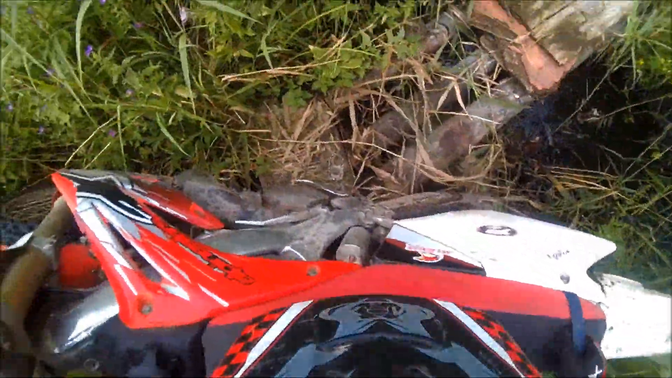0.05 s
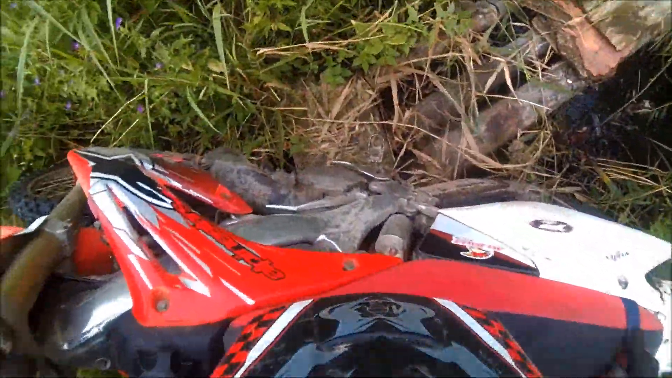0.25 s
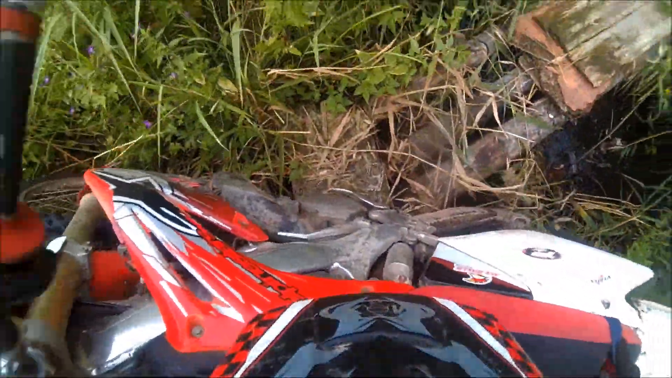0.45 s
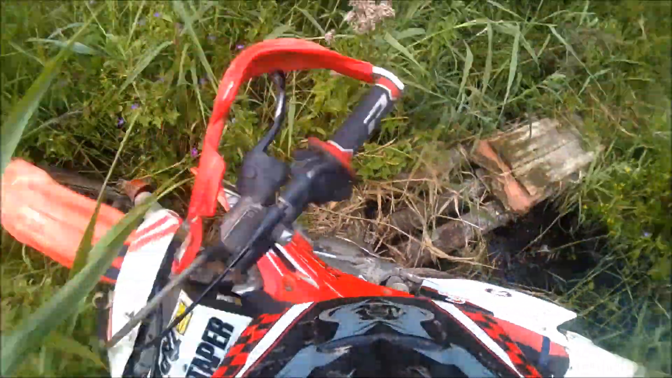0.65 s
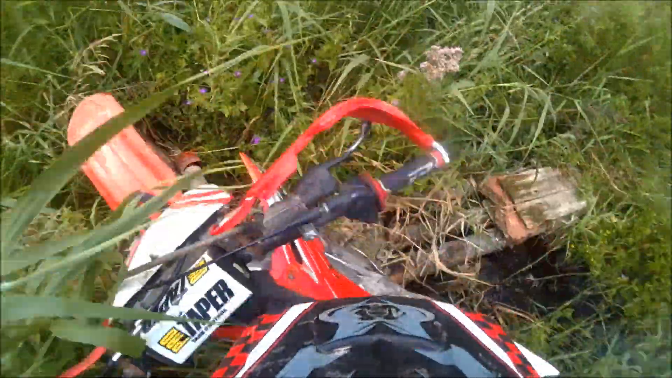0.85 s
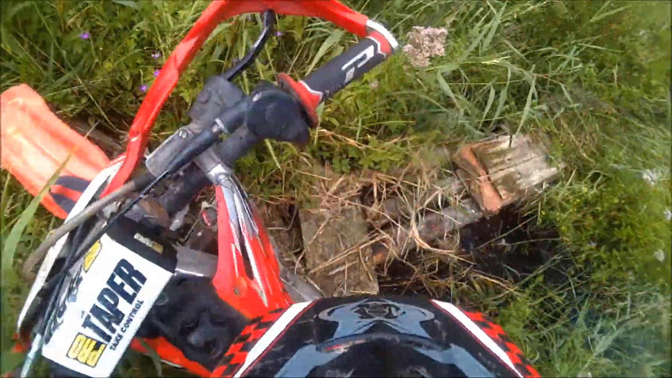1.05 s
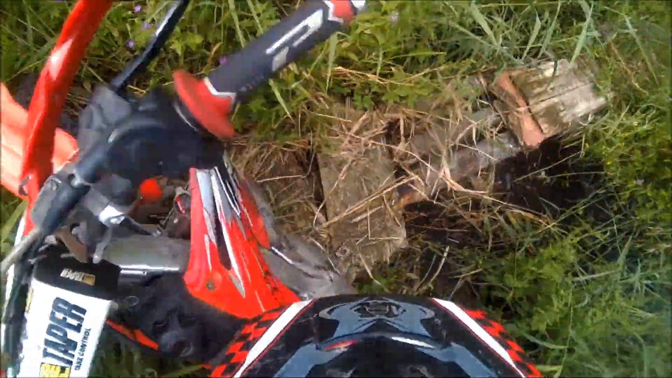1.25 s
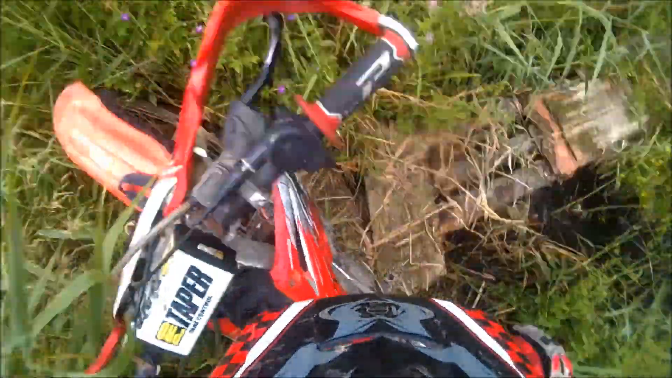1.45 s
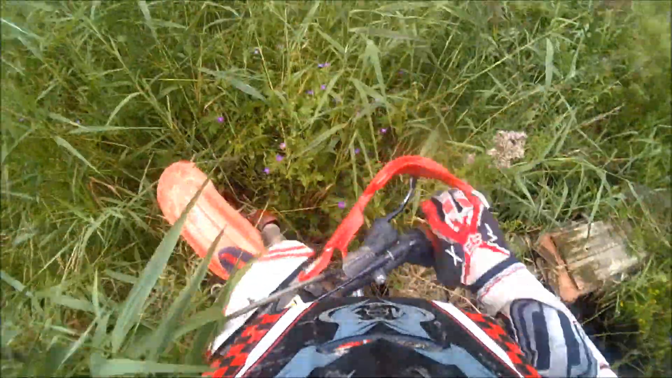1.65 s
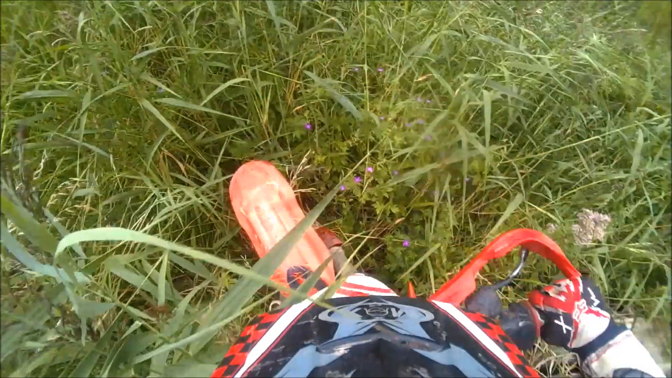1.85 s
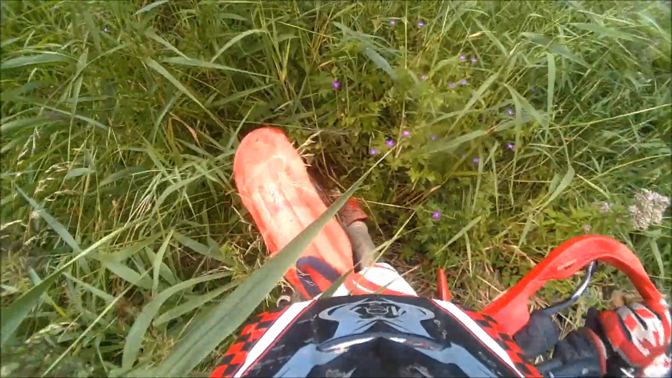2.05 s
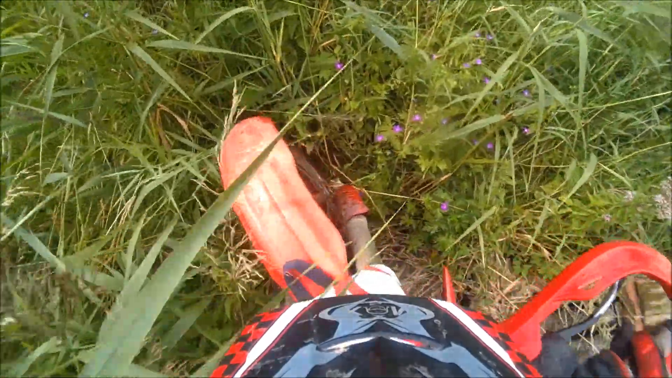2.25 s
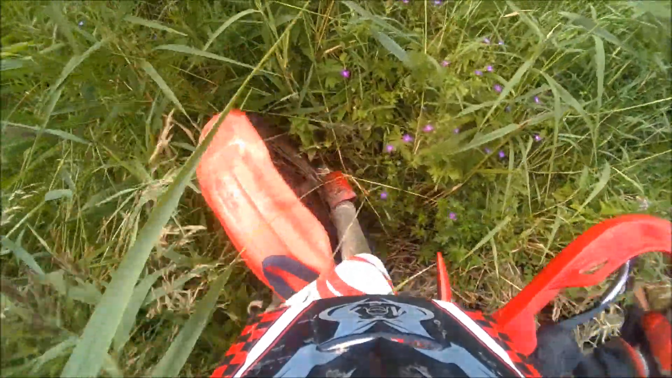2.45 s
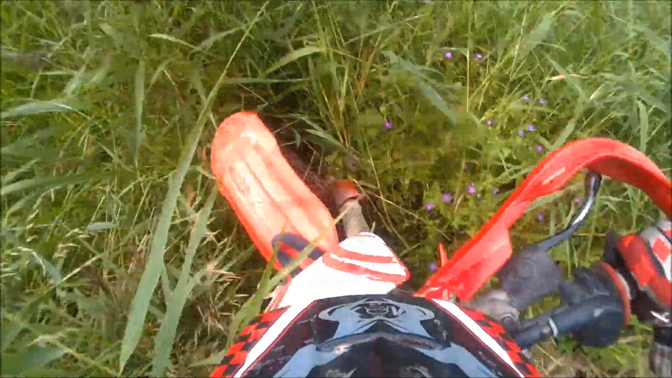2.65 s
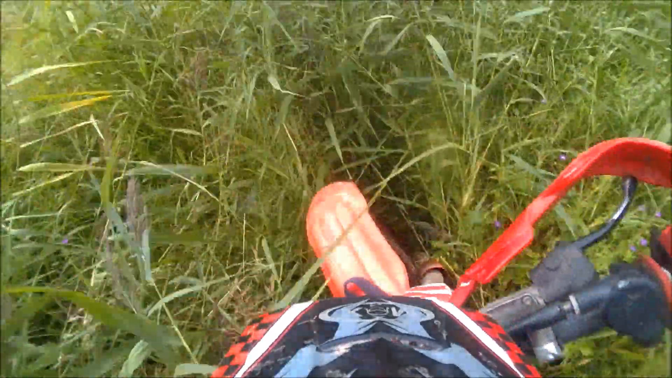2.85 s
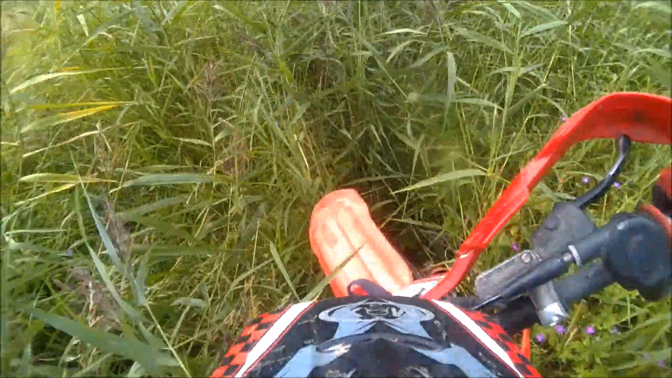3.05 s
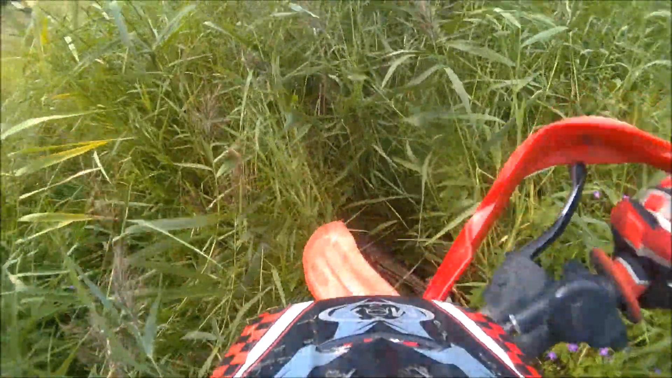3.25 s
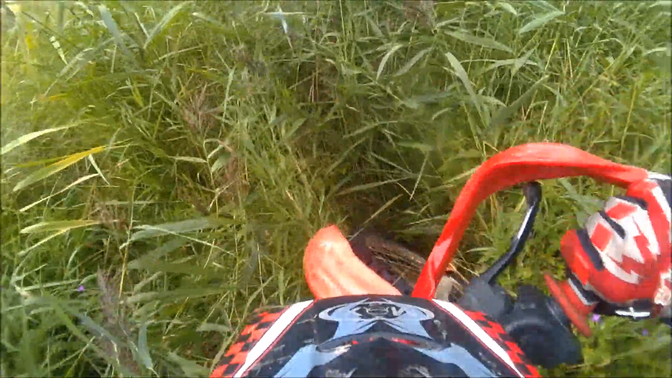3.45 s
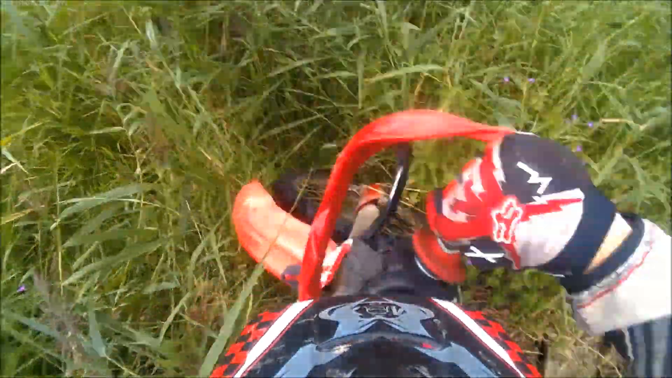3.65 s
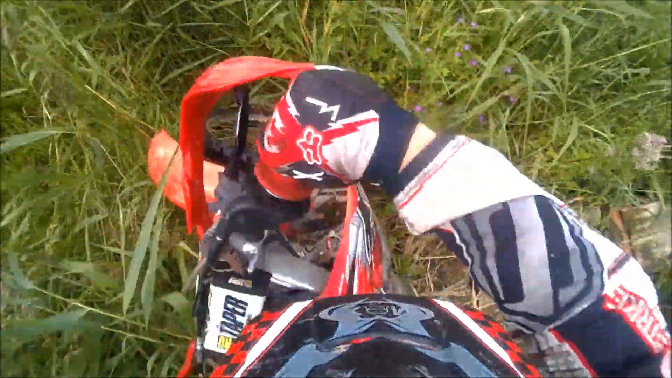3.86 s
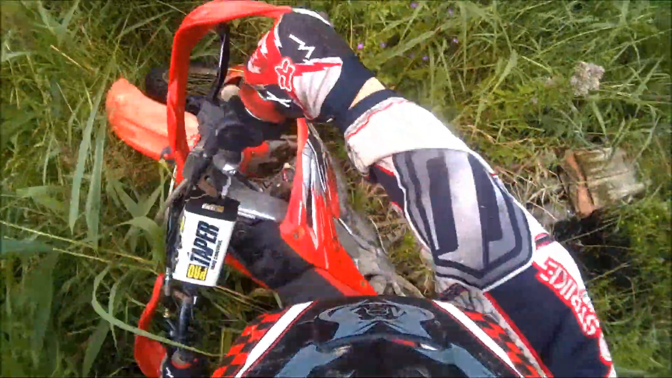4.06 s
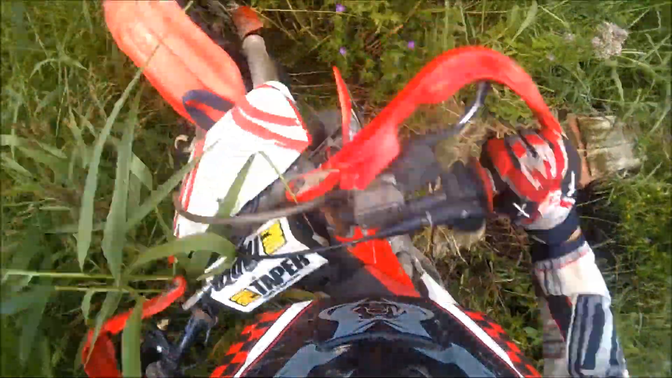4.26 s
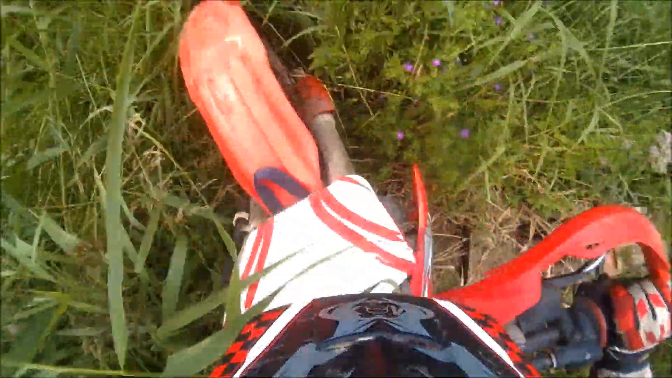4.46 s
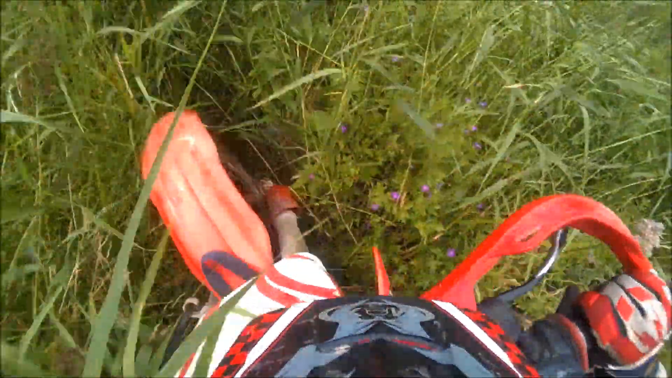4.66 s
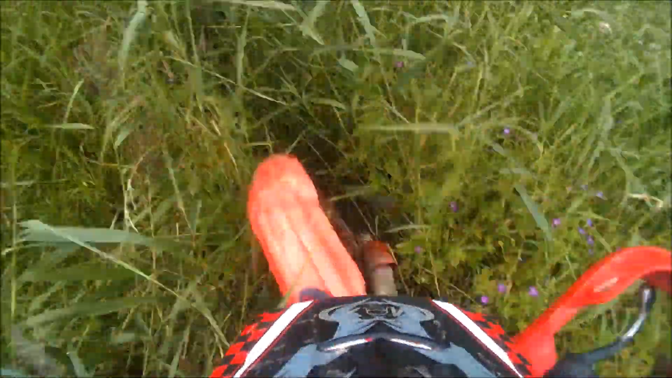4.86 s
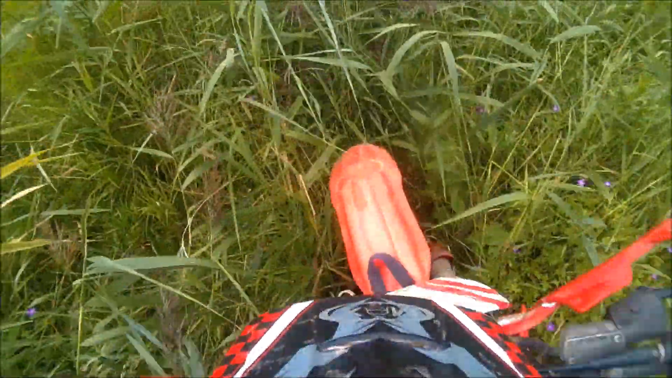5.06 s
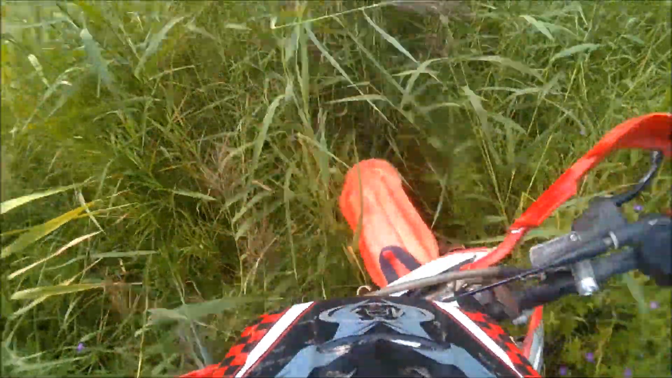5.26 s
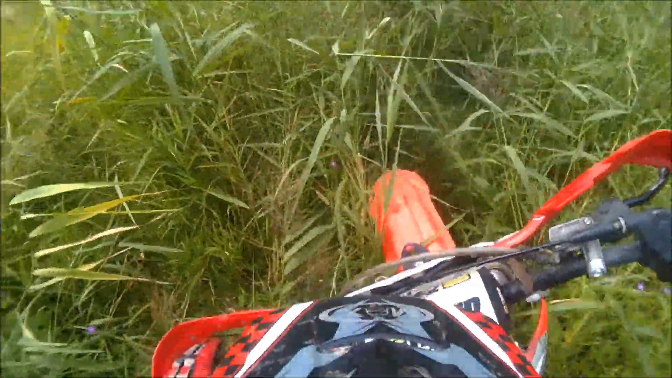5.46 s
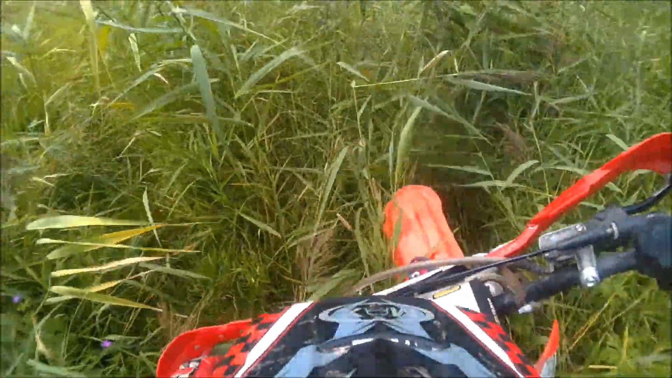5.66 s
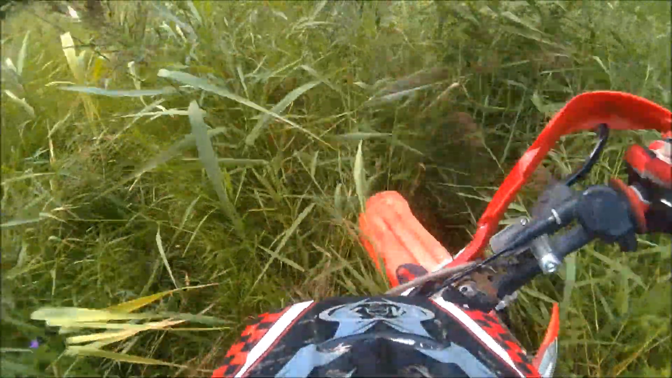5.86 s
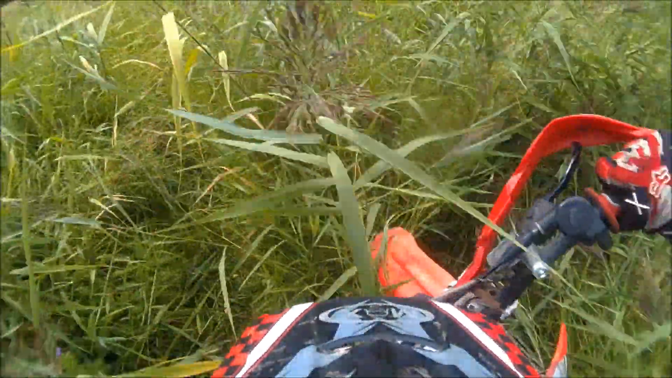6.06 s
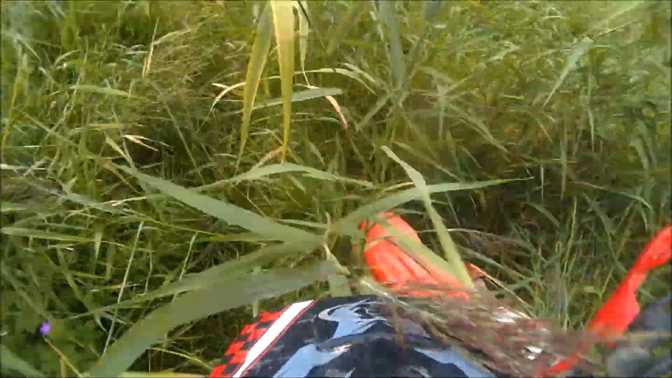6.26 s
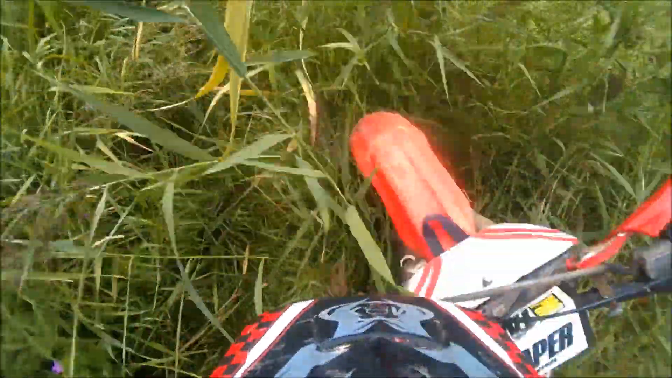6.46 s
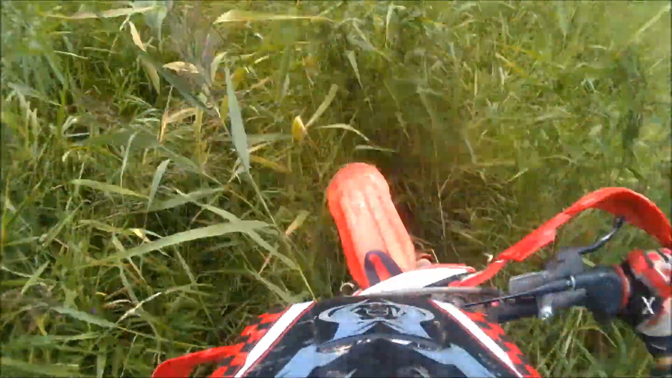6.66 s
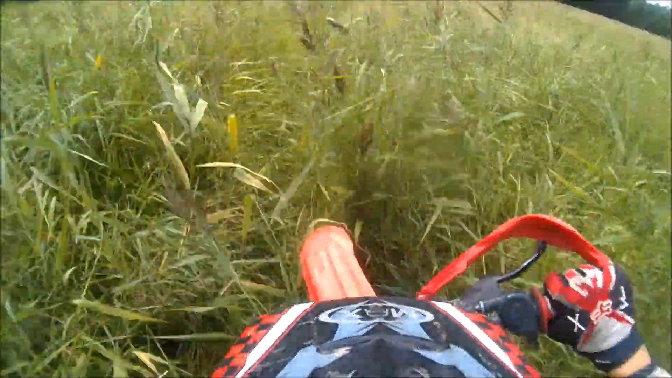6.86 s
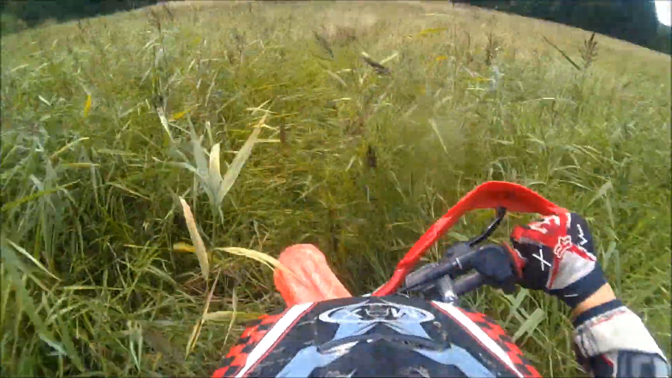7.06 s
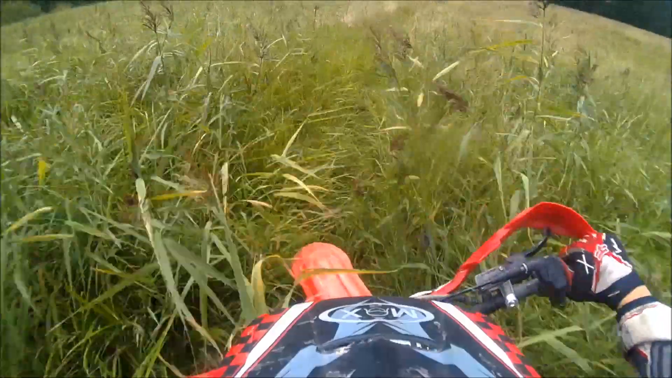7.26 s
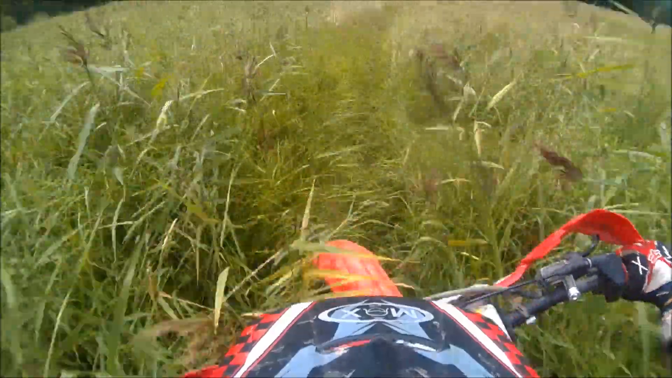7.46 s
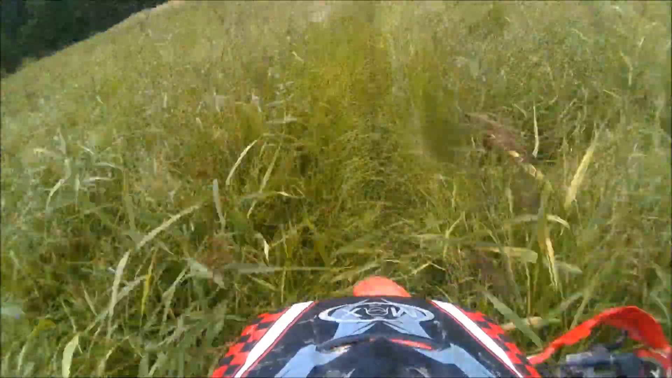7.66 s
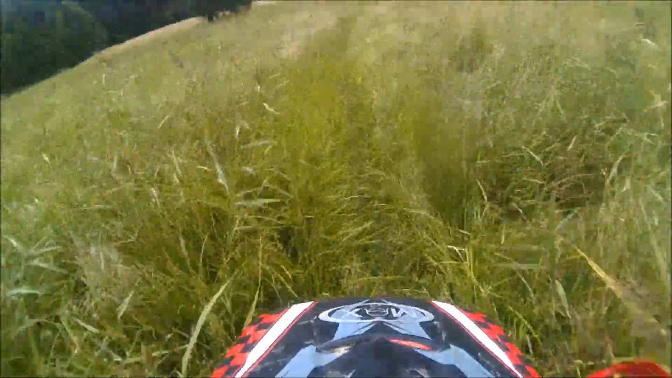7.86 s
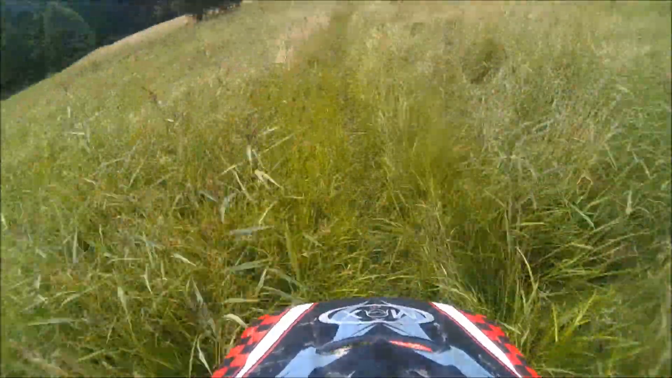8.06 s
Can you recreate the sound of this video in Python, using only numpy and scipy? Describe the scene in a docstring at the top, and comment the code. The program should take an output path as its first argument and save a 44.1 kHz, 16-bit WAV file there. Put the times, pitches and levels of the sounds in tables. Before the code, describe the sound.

Close to a helmet-mounted microphone, a rattling two-stroke dirt bike engine sinks to an uneven idle, with a short scrape on the helmet. The rider opens the throttle, lets the revs fall, then opens it again for longer, the engine buzzing with a metallic rasp and irregular hard pops. As it winds down with a gear whine, a single sharp knock cracks against the helmet.

```python
"""Dirt bike from a helmet camera

A two-stroke engine coasts down to a lumpy idle, is revved twice, stutters and slows with whining gears.
Its firings rattle the crankcase, ring the cylinder and pipe, and puff out of the exhaust.
The helmet is scraped, later sharply knocked, and the camera wobbles on its mount.
The camera's sealed housing rings, and the loudest pulses overload its microphone."""
import sys
import numpy as np
from scipy import signal
from scipy.fft import rfft, irfft, next_fast_len
from scipy.io import wavfile
from scipy.ndimage import uniform_filter1d, minimum_filter1d, map_coordinates

SR = 44100
rng = np.random.default_rng(int(sys.argv[2]) if len(sys.argv) > 2 else 0)


def generate_wav(sig):
    """Save sig (samples, or channels by samples) to the path in sys.argv[1] as 16-bit PCM at SR."""
    pcm = np.round(np.clip(np.atleast_2d(sig).T, -1, 1) * 32767).astype(np.int16)
    wavfile.write(sys.argv[1], SR, pcm)


N = 358088
T = np.arange(N) / SR
CRUISE_TURNS_PER_S = 100


def from_db(db):
    """Turn decibels into a gain."""
    return 10 ** (np.asarray(db) / 20)


def unit_level(x):
    """Scale a sound so that its average level (rms) is 1."""
    return x / np.sqrt(np.mean(x ** 2) + 1e-20)


def evened(x, size=4000):
    """Hold the level near 1 all along; quick beats stay."""
    power = uniform_filter1d(uniform_filter1d(x ** 2, size), size)
    return x / np.sqrt(np.abs(power) + 1e-12)


def curve(rows):
    """Join (time, value) points with straight lines."""
    return np.interp(T, *np.transpose(rows))


def drift(rate):
    """A smooth random wander of about 1 either way, through `rate` points a second."""
    points = rng.standard_normal(N // 8)[:int(T[-1] * rate) + 4]
    return unit_level(map_coordinates(points, [T * rate], order=3, mode="nearest"))


# Pitches that the camera housing boosts or dulls: f/Hz, width/Hz, level/dB
HOUSING_RESONANCES = [(1426, 91, 8), (1702, 61, -4), (1915, 230, 4.5), (2198, 130, -1.5), (2315, 65, 7.5),
                      (2623, 55, 5.5), (3670, 42, 4), (4470, 350, 4)]

def housed(x, colour):
    """Filter a sound by its own tone colour and by the ringing of the housing."""
    size = 2 * next_fast_len(N // 2 + 8192)
    hz = np.arange(size // 2 + 1) * SR / size + 1e-3
    colour_hz, colour_db = np.transpose(colour)
    db = np.interp(np.log(hz), np.log(colour_hz), colour_db)
    for centre, width, peak_db in HOUSING_RESONANCES:
        db += peak_db / (1 + (2 * (hz - centre) / width) ** 2)
    cepstrum = irfft(db * np.log(10) / 20)
    cepstrum[1:size // 2] *= 2   # folded so that nothing rings before it is struck
    cepstrum[size // 2 + 1:] = 0
    return irfft(rfft(x, size) * np.exp(rfft(cepstrum)))[:N]


# Tone colour of the hiss, and of the overloaded microphone's sizzle: f/Hz, level/dB
SIZZLE_COLOUR = [(4000, -26), (5500, -9.5), (6150, -14), (6700, 0), (7400, -11.5), (8000, -31),
                 (9200, -4.5), (10400, -0.5), (13000, -11), (15500, -14.5)]

def electronics(hiss_db, whistle_hz, whistle_db):
    """The camera's own faint hiss and high whistle."""
    whistle = np.sin(2 * np.pi * np.cumsum(whistle_hz + 45 * drift(200)) / SR)
    hiss = unit_level(housed(rng.standard_normal(N), SIZZLE_COLOUR))
    return from_db(hiss_db) * hiss + from_db(whistle_db) * whistle


# Tone colour of the overloaded microphone's dull thud: f/Hz, level/dB
THUD_COLOUR = [(20, -11), (60, -3), (110, -7), (200, -3), (400, -4), (900, -11.5), (2000, -43.5)]

def microphone_overload(bike):
    """The loudest pulses overload the microphone, adding a bright sizzle and a dull thud."""
    push = np.sqrt(np.abs(uniform_filter1d(bike ** 2, size=30)) + 1e-12)
    push = np.minimum(push, .62)
    sizzle = housed(rng.standard_normal(N) * push ** 2.1, SIZZLE_COLOUR)
    thud = housed(rng.standard_normal(N) * push ** 2.8, THUD_COLOUR)
    return from_db(-70.5) * unit_level(sizzle) + from_db(-51) * unit_level(thud)


# Jolts that shake the camera: t/s, level/dB
MOUNT_JOLTS = [(.62, -38.5), (1.12, -53), (1.7, -46), (2.87, -42.5), (4.39, -37.5), (4.82, -47), (6.2, -49),
               (6.64, -47.5), (6.85, -41.5), (7.235, -26.5), (7.66, -48)]

def wobble(mount_hz, rise_s, fall_s, sway_db):
    """The camera rocks on its mount at one low, unsteady pitch: always a little, more after a jolt."""
    reach = from_db(sway_db + 4 * drift(6.4))
    for s, db in MOUNT_JOLTS:
        rise = np.clip((T - s) / rise_s + 1, 0, 1)
        reach += from_db(db) * rise * np.exp(-np.maximum(T - s, 0) / fall_s)
    rocking = np.sin(2 * np.pi * np.cumsum(mount_hz * (1 + .1 * drift(25))) / SR)
    band = signal.butter(2, [20, 55], "band", fs=SR, output="sos")
    rumble = signal.sosfilt(band, signal.sosfilt(band, rng.standard_normal(N)))
    return reach * unit_level(rocking + .099 * unit_level(rumble))


def contacts(rows, colour):
    """Each contact is a dying rattle of tiny impacts carried into the housing."""
    grit = rng.choice([-1., 1.], N)
    force = sum(from_db(db) * (T >= s) * np.exp(-np.abs(T - s) / decay) for s, db, decay in rows)
    return housed(grit * force, colour) / np.std(housed(grit, colour))


# Scrapes on the helmet: t/s, level/dB, decay/s
HELMET_SCRAPES = [(.589, -29, 0.015), (.604, -22.5, 0.013), (.625, -21, 0.011), (.638, -8.5, 0.0034),
                  (.643, -27, 0.0019), (.686, -23.5, 0.0075), (1.884, -23, 0.0016)]
# Their tone colour: f/Hz, level/dB
SCRAPE_COLOUR = [(60, -20), (700, -16), (1300, 2), (2000, -2.5), (3000, 3.5), (3900, -23), (4600, -16),
                 (6000, -53), (6800, -33), (8000, -55), (10000, -37), (15500, -61)]

def scrape():
    """Something drags over the helmet and snaps free."""
    return contacts(HELMET_SCRAPES, SCRAPE_COLOUR)


# The rattle just after the knock: t/s, level/dB, decay/s
KNOCK_RATTLE = [(7.2262, -9, 0.0015), (7.229, -18, 0.0036)]
# Tone colour of the knock and its rattle: f/Hz, level/dB
KNOCK_COLOUR = [(30, -2.5), (150, 1), (330, -10.5), (500, 0.5), (750, -11), (1400, 2), (2000, 3),
                (2600, 3.5), (3500, -20), (4600, -27.5), (6000, -74), (10000, -56), (16000, -82)]

def knock(at_s, crack_db, thump_hz, thump_db, thump_s):
    """One hard push cracks through the housing, and the helmet's shell answers with a short thump."""
    push = np.zeros(N)
    push[int(at_s * SR)] = 1
    crack = housed(push, KNOCK_COLOUR)
    crack *= from_db(crack_db) / np.abs(crack).max()
    age = np.maximum(T - at_s, 0)
    thump = from_db(thump_db) * np.sin(2 * np.pi * thump_hz * age) * np.exp(-age / thump_s)
    return crack + thump + contacts(KNOCK_RATTLE, KNOCK_COLOUR)


def tones(turns, rows, waver_db):
    """Pure tones at multiples of the crankshaft's speed, each swelling and fading on its own."""
    out = np.zeros(N)
    for multiple, db in rows:
        gain = from_db(db + waver_db * drift(9))
        out += gain * np.sin(2 * np.pi * (multiple * turns + rng.random()))
    return unit_level(out)


def clatter(turns, rough, beat_db, scatter_db, size=4096, count=170):
    """Every turn repeats a slowly changing pattern of small knocks; rough running blurs it to noise."""
    patterns = irfft(np.c_[np.zeros(3), np.exp(2j * np.pi * rng.random((3, count)))], size)
    repeating = evened(sum(drift(8) * np.interp(turns % 1, np.arange(size) / size, p) for p in patterns))
    rough = np.clip(rough, 0, 1)
    knocks = np.sqrt(1 - rough) * repeating + np.sqrt(rough) * rng.standard_normal(N)
    beat = np.cos(2 * np.pi * turns)   # peaks as the exhaust port opens
    strength = rng.standard_normal(size)[(turns + .5).astype(int) % size]   # no two strokes are equal
    return knocks * from_db(beat_db * rough * beat + scatter_db * strength * (1 + beat) / 2)


# Loudness of the gear whine: t/s, level/dB
WHINE_LEVEL = [(0, -24), (.17, -25.5), (.32, -30.5), (.6, -54), (7.2, -59), (7.33, -36), (7.58, -36.5),
               (7.75, -28), (7.88, -38.5), (8.0, -53)]
# Tones of the gear teeth: multiple of crankshaft speed, relative level/dB
GEAR_TONES = [(20, -9.5), (21, 1), (22, -3), (23, -2.5), (24, -10)]

def gear_whine(turns):
    """Meshing gear teeth sing through the crankcase as the engine runs down."""
    teeth = tones(turns + .012 * drift(90), GEAR_TONES, waver_db=-.5)
    return evened(housed(teeth, CRANKCASE_COLOUR)) * from_db(curve(WHINE_LEVEL))


# Pitches where engine overtones sing out, boosted by the exhaust or the camera housing:
# f/Hz, width/Hz, level/dB in fully smooth cruising
SINGING_PITCHES = [(236, 38, -32), (465, 60, -37.5), (650, 40, -37), (793, 70, -37.5), (1396, 170, -16.5),
                   (1905, 160, -18.5), (2330, 120, -21.5)]

def singing(turns, speed, rough, doubling_db):
    """Engine overtones sing out as they slide past a resonance, most in fast, smooth running."""
    out = np.zeros(N)
    for hz, width, db in SINGING_PITCHES:
        multiple = np.round(hz / speed)
        off_hz = multiple * speed - hz
        in_tune = np.cos(np.pi * off_hz / speed) / np.sqrt(1 + (2 * off_hz / width) ** 2)
        cycles = multiple * turns + rng.random() + .058 * drift(7)
        out += from_db(db) * in_tune * np.sin(2 * np.pi * cycles)
    return out * (1 - rough) ** 2 * from_db(doubling_db * np.log2(speed / CRUISE_TURNS_PER_S))


# Tones of the exhaust's hum: multiple of crankshaft speed, relative level/dB
EXHAUST_TONES = [(1, -4.5), (2, 1), (3, 2.5), (4, -1), (5, 3.5), (6, 1.5), (7, 4), (8, 3.5), (9, -2.5),
                 (10, -4.5), (11, -6.5), (12, -8)]
# Tone colour of the exhaust: f/Hz, level/dB
EXHAUST_COLOUR = [(50, -33.5), (110, -12.5), (165, -10.5), (230, 4), (285, -5.5), (350, 0), (440, 3.5),
                  (520, 5.5), (590, -3), (670, 7), (800, -20.5), (1100, -6), (2000, -34.5), (5000, -73.5)]

def exhaust(turns, rough, swell):
    """Gas leaves once a turn: a hum in smooth running, with more noisy puffs when rough."""
    puffs = clatter(turns, 1, beat_db=2.2, scatter_db=2.5) * swell * np.sqrt(rough)
    puffs = unit_level(housed(puffs, EXHAUST_COLOUR))
    hum = unit_level(housed(tones(turns, EXHAUST_TONES, waver_db=4.5), EXHAUST_COLOUR))
    return evened(hum * (1.15 - rough) + puffs * from_db(-9))


# Tone colour of the crankcase: f/Hz, level/dB
CRANKCASE_COLOUR = [(300, -46), (700, -19.5), (950, -12.5), (1130, -2), (1300, 3), (1500, -6.5),
                    (1750, -13.5), (2400, -27), (4000, -50), (6000, -84.5)]

def crankcase(turns, rough, swell):
    """The case around the crankshaft clatters with every turn."""
    knocks = clatter(turns, .91 * rough, beat_db=-.5, scatter_db=2.5)
    return evened(housed(knocks * swell, CRANKCASE_COLOUR))


# Tone colour of the cylinder: f/Hz, level/dB
CYLINDER_COLOUR = [(1000, -44.5), (1550, -4.5), (1780, -4), (1950, 2), (2080, -2.5), (2250, -16),
                   (2620, -8.5), (2900, -10.5), (3400, -29.5), (4100, -43), (4550, -32), (5600, -67)]

def cylinder(turns, rough, swell):
    """Bursts of burning fuel make the cylinder ring."""
    knocks = clatter(turns, .98 * rough, beat_db=-1, scatter_db=1.2)
    return evened(housed(knocks * swell ** .76, CYLINDER_COLOUR))


# Tone colour of the expansion pipe, the wide part of the exhaust: f/Hz, level/dB
PIPE_COLOUR = [(1400, -31), (2050, -5.5), (2300, 2), (2600, -0.5), (2850, -2.5), (3150, -8.5), (3700, -15),
               (4050, -29.5), (4600, -26), (5000, -35), (5450, -41), (6000, -66), (9000, -95)]

def pipe(turns, rough, swell):
    """Each firing makes the pipe's thin wall rasp."""
    knocks = clatter(turns, 1.1 * rough, beat_db=1, scatter_db=2.5)
    return evened(housed(knocks * swell ** 1.06, PIPE_COLOUR))


def putter(turns, speed, rough, swing_db):
    """At idle each turn is a beat of its own; with more speed the beats run together."""
    deepest, merged = 29, 88   # turns per second
    apart = np.clip((merged - speed) / (merged - deepest), 0, 1)
    return from_db(swing_db * apart * rough * np.cos(2 * np.pi * turns))


def stutter(turns, rough, threshold=.4, count=300):
    """Rows of (time, strength): every 3 to 5 turns the fuel catches, harder in rough running."""
    turn = np.cumsum(rng.integers(3, 6, count))
    times = np.interp(turn, turns, T)
    amount = np.clip((np.interp(times, T, rough) - threshold) / (1 - threshold), 0, 1)
    db = amount * (4.5 + 1.5 * rng.standard_normal(count))
    return np.c_[times, db][turn < turns[-1]]


# The hardest firings: t/s, level/dB above the running engine before scaling by `height`
HARD_FIRINGS = [(.693, 5.5), (.791, 2.5), (.956, 7), (1.126, 6), (1.248, 7.5), (1.695, 3.5), (1.884, 5.5),
                (1.923, 6), (2.395, 7.5), (2.437, 5.5), (2.483, 4.5), (2.633, 5), (2.683, 5), (2.725, 8.5),
                (2.794, 5), (2.895, 4.5), (2.964, 9), (3.201, 8.5), (3.24, 5.5), (3.279, 3.5), (3.368, 6),
                (3.41, 4.5), (3.48, 8), (4.246, 9), (4.278, 6.5), (4.514, 4), (4.883, 11.5), (5.003, 8.5),
                (5.568, 5), (5.769, 4), (5.92, 6), (5.99, 4), (6.068, 3.5), (6.134, 5.5), (6.162, 4.5),
                (6.248, 5.5), (7.754, 5), (7.802, 6), (7.969, 4), (8.095, 8)]

def firings(turns, rough, rise_s, fall_s, lead_s, height, gap_s):
    """Hard firings, and the stutter in the gaps between them, each briefly swell the engine's noise."""
    hard_times = np.array(HARD_FIRINGS)[:, 0]
    catches = [(s, db) for s, db in stutter(turns, rough) if np.abs(s - hard_times).min() > gap_s]
    swell = np.ones(N)
    for s, db in [*HARD_FIRINGS, *catches]:
        near = slice(max(int((s - .03) * SR), 0), int((s + .05) * SR))
        lag = T[near] - s + lead_s
        shape = np.exp(-np.where(lag < 0, (lag / rise_s) ** 2, lag / fall_s))
        swell[near] += height * (from_db(db) - 1) * shape
    return np.maximum(swell, .2)


# How fast the crankshaft spins: t/s, speed/(turns per s)
CRANK_SPEED = [(0, 55), (.25, 52), (.55, 42.4), (.75, 36.5), (1.85, 37.4), (1.98, 64.3), (2.1, 63.4),
               (2.21, 109), (2.33, 119), (2.39, 105.8), (2.72, 97.7), (2.84, 110), (2.96, 121.5),
               (3.15, 105.2), (3.24, 110), (3.47, 114), (3.58, 96.5), (3.7, 95), (3.85, 82.3), (4.3, 61.5),
               (4.37, 95), (4.44, 106), (4.59, 103), (4.68, 111), (4.79, 123.5), (4.93, 116), (5.11, 108.6),
               (6.09, 103.2), (6.18, 82.3), (6.45, 91.6), (6.6, 96), (6.83, 95), (7.0, 73.5), (7.65, 51.7),
               (7.9, 41.3), (8.12, 33.6)]
# The throttle, two long bursts opened with blips and a last small one: t/s, opening (0-1)
THROTTLE_OPENING = [(0, 0.28), (.5, 0.15), (.8, 0.27), (1.75, 0), (1.99, 0.24), (2.1, 0), (2.16, 0.49),
                    (2.21, 0.38), (2.29, 1), (2.35, 0.5), (2.73, .48), (2.9, 0.79), (3.12, 0.29),
                    (3.2, 0.66), (3.49, 0.44), (3.73, 0.12), (4.19, 0.01), (4.39, 0.41), (4.49, 0.62),
                    (4.62, 0.59), (4.75, .66), (4.83, 0.45), (4.9, 0.85), (5.02, 0.46), (6.14, 0.51),
                    (6.26, 0.29), (6.75, 0.49), (7.57, 0), (7.76, 0.47), (7.95, 0.12), (8.12, 0.45)]
# How unevenly the engine runs: t/s, roughness (0-1)
ROUGHNESS = [(0, 0.51), (.8, 0.79), (2.1, 0.84), (2.3, 0.54), (2.7, 0.84), (2.95, .35), (3.12, .28),
             (3.25, .6), (3.6, .46), (4.2, 0.53), (4.35, .73), (4.65, .66), (4.8, .36), (4.98, .38),
             (5.15, 0.74), (6.15, 0.79), (6.7, .58), (7.05, .72), (7.5, .55), (8.12, .85)]
# Level added to the pipe and taken from the cylinder: t/s, level/dB
PIPE_OVER_CYLINDER = [(0, -1), (1.3, 4), (1.7, 0.5), (2.55, 1), (3.1, -1), (3.45, 2), (4.3, 1.5), (4.9, .5),
                      (5.2, -1.5), (6.1, 0.5), (6.7, -3), (8.12, -1)]

def engine():
    """All parts follow one crankshaft; the main four grow louder with speed and throttle."""
    throttle, rough = curve(THROTTLE_OPENING), curve(ROUGHNESS)
    balance = from_db(curve(PIPE_OVER_CYLINDER))
    speed = curve(CRANK_SPEED) * (1 + .011 * rough ** 2 * drift(9))   # wanders when rough
    turns = np.cumsum(speed * (1 + .00586 * rough * drift(50))) / SR
    swell = firings(turns, rough, rise_s=.0038, fall_s=.0095, lead_s=.0021, height=1.57, gap_s=.022)
    swell *= putter(turns, speed, rough, swing_db=2.4)

    def gain(base_db, doubling_db, throttle_db):
        """A base level, plus so much per doubling of speed and so much for full throttle."""
        doublings = np.log2(speed / CRUISE_TURNS_PER_S)
        return from_db(base_db + doubling_db * doublings + throttle_db * throttle)

    rattle = crankcase(turns, rough, swell) * gain(-26.5, 7.25, 14.6)
    ring = cylinder(turns, rough, swell) * gain(-28, 11.6, 13.95) / balance
    rasp = pipe(turns, rough, swell) * gain(-30.5, 9.27, 20.1) * balance
    hum = exhaust(turns, rough, swell) * gain(-45, 7.3, 14)
    return rattle + ring + rasp + hum + gear_whine(turns) + singing(turns, speed, rough, doubling_db=30.5)


def scene():
    """Bike, helmet and camera in one channel."""
    bike = engine()
    bike += microphone_overload(bike)
    helmet = scrape() + knock(at_s=7.2256, crack_db=-2.8, thump_hz=140.8, thump_db=-28, thump_s=.0057)
    camera = wobble(mount_hz=30, rise_s=.025, fall_s=.13, sway_db=-55)
    camera += electronics(hiss_db=-81.5, whistle_hz=14580, whistle_db=-80.5)
    return (bike + helmet + camera)[None]


def record(dry):
    """A quick limiter turns down the loudest peaks, then the highest treble is cut."""
    allowed = np.minimum(1, .93 / (np.abs(dry) + 1e-9))
    gain = minimum_filter1d(allowed, size=161)
    gain = uniform_filter1d(uniform_filter1d(gain, size=81), size=81)
    treble_cut = signal.cheby2(14, 60, 16300, fs=SR, output="sos")
    return signal.sosfilt(treble_cut, dry * gain)


dry = scene()
out = record(dry)
generate_wav(out)
```